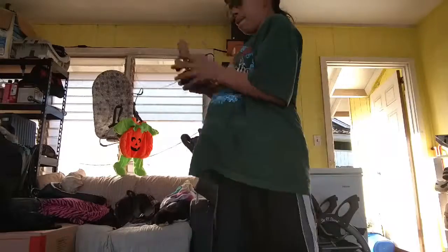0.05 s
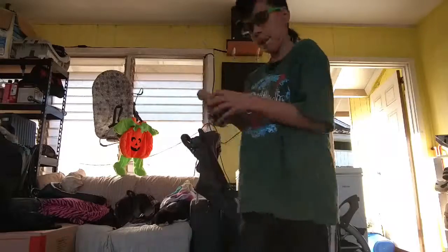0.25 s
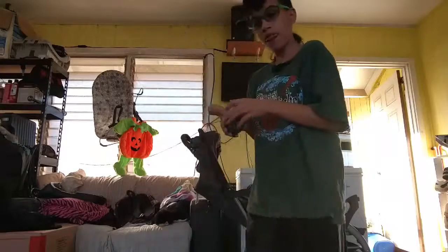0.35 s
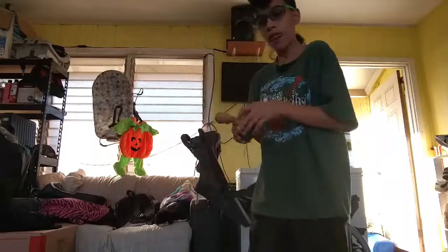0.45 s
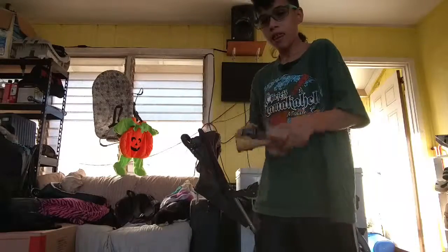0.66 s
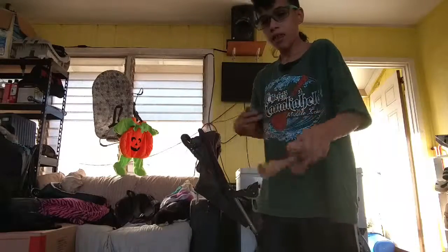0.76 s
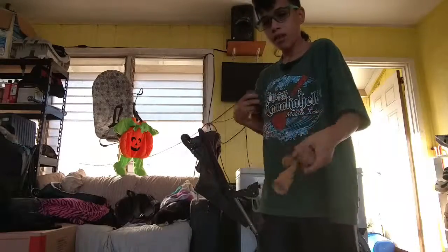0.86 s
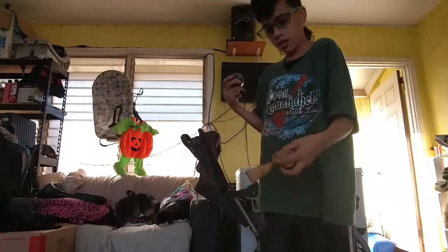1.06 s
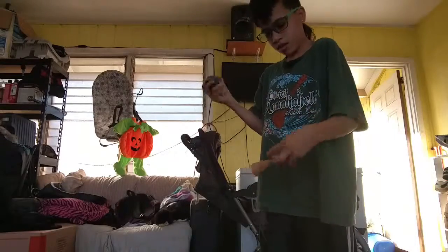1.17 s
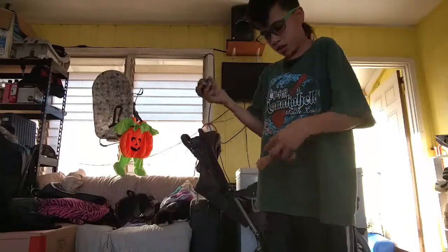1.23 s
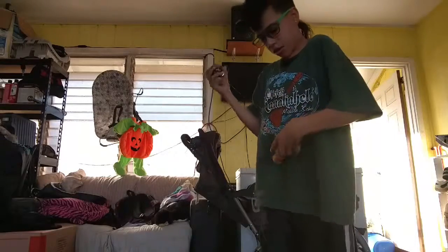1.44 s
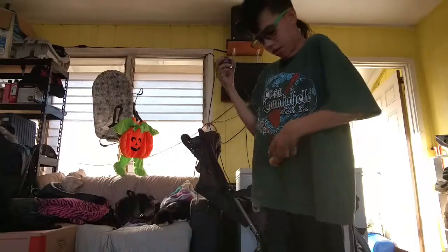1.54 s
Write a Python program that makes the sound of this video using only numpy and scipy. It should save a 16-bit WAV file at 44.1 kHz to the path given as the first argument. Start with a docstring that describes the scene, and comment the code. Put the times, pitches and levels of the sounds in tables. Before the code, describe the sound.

One sharp wooden clack of a kendama ball on its cup, with faint room hiss.

```python
"""A dull knock in the hand, one sharp clack of a wooden ball on its cup, then a few faint taps.
A kendama is being handled in a small, quiet living room; each contact rings the wood for milliseconds.
Ceiling, floor and walls close by throw each one back to the microphone, with a short tail.
Underneath lie a faint appliance hum, room noise and microphone hiss."""
import sys
import numpy as np
from scipy import signal
from scipy.fft import rfft, irfft
from scipy.io import wavfile

SR = 44100
rng = np.random.default_rng(int(sys.argv[2]) if len(sys.argv) > 2 else 0)


def to_wav(sig):
    """Store sig (one row per channel, or 1-D mono) as 16-bit WAV at the path in sys.argv[1].

    Samples outside -1..1 are clipped; the rate is SR.
    """
    pcm = np.clip(np.atleast_2d(sig), -1, 1) * 32767
    pcm = np.round(pcm).astype(np.int16)
    wavfile.write(sys.argv[1], SR, pcm.T)  # frames by channels


N = 70560

# The ball strikes the cup. Each row: start in seconds, level in dB.
CUP_STRIKES = [(0.20807, -0.5)]
# The ring of ball and cup. Each row: pitch in Hz, level in dB, width in Hz, room send in dB.
CUP_MODES = [(783, -38, 400, 12), (1150, -23.5, 560, 6), (1800, -10, 1017, -1.5), (2042, -19.5, 690, -1),
             (3116, -17.5, 1030, 1), (3398, -11.5, 292, -4.5), (3445, -34, 168, -3), (3590, -26, 230, 0),
             (5250, -30, 2600, -7), (6670, -42.5, 350, 8), (8400, -29.5, 810, -4.5), (11399, -35, 1342, -7)]
# The toy knocks in the hand. Each row: start in seconds, level in dB.
HAND_KNOCKS = [(0.0635, -21), (0.0922, 3), (0.0990, -9), (0.1240, -9), (0.1430, -13), (0.1635, -17),
               (0.8005, -18), (0.8200, -17)]
# Its damped ring. Each row: pitch in Hz, level in dB, width in Hz, room send in dB.
HAND_MODES = [(450, -37, 300, -1), (760, -33.5, 410, 1), (941, -38, 280, 10), (1890, -39.5, 290, -1),
              (2850, -49, 420, 1), (3450, -39, 630, 1)]
# The ball settles softly against fingers and handle. Each row: start in seconds, level in dB.
SETTLING_TAPS = [(0.4975, 0.5), (0.5065, 2)]
# The ring of those taps. Each row: pitch in Hz, level in dB, width in Hz, room send in dB.
SETTLING_MODES = [(820, -43.5, 540, -1), (1454, -42.5, 200, -3.5), (1876, -50.5, 134, -2)]
# Early echoes off ceiling, floor and walls. Each row: delay in seconds, level in dB.
EARLY_ECHOES = [(0.0072, -11), (0.0091, -15.5), (0.0121, -16), (0.0135, -19.5), (0.0151, -19.5),
                (0.0161, -17), (0.0196, -21)]
# An appliance hums. Each row: pitch in Hz, rms level in dB before the bass gain.
HUM_TONES = [(147, -67), (177.6, -64), (237, -72), (624.5, -75)]
# The room's low rumble. Each row: frequency in Hz, relative level in dB.
RUMBLE_SPECTRUM = [(20, -12), (50, -11), (100, 0), (160, -1), (250, -4), (400, -9.5), (800, -30)]
# Hum and rumble rise and fall together. Each row: time in seconds, gain in dB.
BASS_GAIN = [(0, -1), (.17, 2), (.25, -8), (0.359, -1.5), (0.699, -0.5), (1.15, 3.5), (1.38, 1), (1.6, 3)]
# The colour of the room noise. Each row: frequency in Hz, relative level in dB.
ROOM_NOISE_SPECTRUM = [(100, -37), (220, -5), (330, -4.5), (620, -0.5), (1000, -3.5), (1550, -8.5),
                       (1880, -4), (2350, -19), (2700, -16.5), (3080, -10.5), (3700, -16.5), (6000, -22)]
# The room noise swells and sinks a little. Each row: time in seconds, rms level in dB.
ROOM_NOISE_LEVEL = [(0, -49.5), (.17, -47.5), (.30, -53.5), (.66, -52), (.74, -50.5), (.95, -52),
                    (1.17, -51), (1.38, -52), (1.6, -52)]
# The microphone's own hiss. Each row: frequency in Hz, relative level in dB.
HISS_SPECTRUM = [(1000, 2.5), (4500, -0.5), (8000, -0.5), (9500, 0.5), (10000, 3.5), (10500, -.5),
                 (13000, -2), (16000, -1)]


def kendama(room):
    """Clack, knocks and taps of a wooden toy too small to radiate bass."""
    clack = struck_wood(CUP_STRIKES, CUP_MODES, room)
    knocks = struck_wood(HAND_KNOCKS, HAND_MODES, room)
    taps = struck_wood(SETTLING_TAPS, SETTLING_MODES, room)
    return butterworth(clack + knocks + taps, "high", cutoff_hz=296, order=2)


def struck_wood(blows, modes, room):
    """Each blow sets broad modes swelling and dying in milliseconds, heard direct and off the room."""
    t, direct, to_room = seconds(), 0, 0
    for k, (hz, db, width_hz, send_db) in enumerate(modes):
        age = np.minimum(np.pi * width_hz * t, 60)   # in time constants
        envelope = from_db(db) * age * np.exp(1 - age)
        ring = (-1) ** k * envelope * np.sin(2 * np.pi * hz * t)
        direct += ring
        to_room += from_db(send_db) * ring
    return convolve(impulses(blows), direct + convolve(to_room, room))


def living_room(tail_db=-11.5, split_hz=2540):
    """Echoes off nearby surfaces, smeared by furniture, then a short diffuse tail."""
    smear = sum(from_db(db) * reflections(delay_s, t60_s=0.0019) for delay_s, db in EARLY_ECHOES)
    tail = sum(butterworth(reflections(start_s=0.0069, t60_s=0.29), side, split_hz, order=4)
               for side in ("low", "high"))
    return impulses(EARLY_ECHOES) + smear + from_db(tail_db) * tail


def reflections(start_s, t60_s):
    """A dense run of reflections that dies away; energy 1."""
    age = seconds() - start_s
    decay = (age >= 0) * np.exp(-np.log(1000) * np.abs(age) / t60_s)
    run = rng.standard_normal(N) * decay
    return run / np.sqrt(np.sum(run ** 2))


def appliance_hum(waver=0.85, waver_hz=3):
    """Low appliance tones that waver in level and phase."""
    hum = 0
    for hz, db in HUM_TONES:
        level = 1 + waver * drift(waver_hz)
        phase = 2 * np.pi * hz * seconds() + waver * drift(waver_hz)
        hum += from_db(db) * rms_one(level * np.sin(phase))
    return hum


def room_tone(rumble_db=-62):
    """The quiet room itself: soft noise over a bass of hum and rumble."""
    air = level_curve(ROOM_NOISE_LEVEL) * coloured_noise(ROOM_NOISE_SPECTRUM)
    bass = appliance_hum() + from_db(rumble_db) * coloured_noise(RUMBLE_SPECTRUM)
    return air + level_curve(BASS_GAIN) * bass


def microphone_hiss(rms_db=-53.5):
    """The microphone's steady, nearly white noise."""
    return from_db(rms_db) * coloured_noise(HISS_SPECTRUM)


def coloured_noise(spectrum):
    """Noise with the given spectrum; rms 1."""
    hz, db = np.transpose(spectrum)
    bins_hz = np.maximum(np.fft.rfftfreq(N, 1 / SR), 1)
    gain = from_db(np.interp(np.log(bins_hz), np.log(hz), db))
    return rms_one(irfft(rfft(rng.standard_normal(N)) * gain, N))


def drift(rate_hz):
    """Slow random motion; rms 1."""
    rolloff = 1 + (np.fft.rfftfreq(N, 1 / SR) / rate_hz) ** 2
    return rms_one(irfft(rfft(rng.standard_normal(N)) / rolloff, N))


def impulses(rows):
    """One click for each row of seconds and dB."""
    clicks = np.zeros(N)
    for start_s, db in rows:
        clicks[int(start_s * SR)] += from_db(db)
    return clicks


def level_curve(rows):
    return from_db(np.interp(seconds(), *np.transpose(rows)))


def butterworth(x, side, cutoff_hz, order):
    return signal.sosfilt(signal.butter(order, cutoff_hz, side, fs=SR, output="sos"), x)


def convolve(a, b):
    return signal.fftconvolve(a, b)[:N]


def from_db(db):
    return 10 ** (np.asarray(db) / 20)


def rms_one(x):
    return x / np.sqrt(np.mean(x ** 2) + 1e-20)


def seconds():
    return np.arange(N) / SR


def scene():
    """The toy over room tone and hiss; one microphone feeds both channels."""
    mono = kendama(living_room()) + room_tone() + microphone_hiss()
    return np.stack([mono, mono])


def record(dry, cutoff_hz=15750):
    """The highest treble is cut steeply."""
    return signal.sosfiltfilt(signal.ellip(12, .05, 50, cutoff_hz, fs=SR, output="sos"), dry)


dry = scene()
out = record(dry)
to_wav(out)
```